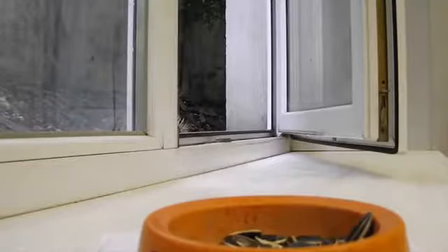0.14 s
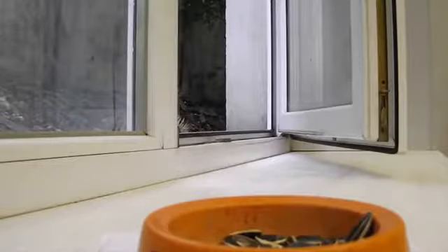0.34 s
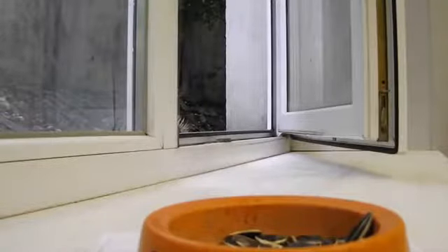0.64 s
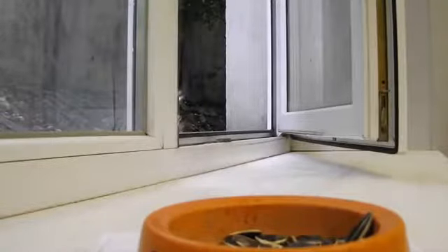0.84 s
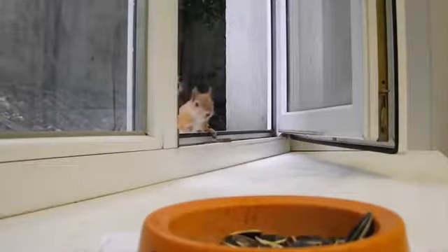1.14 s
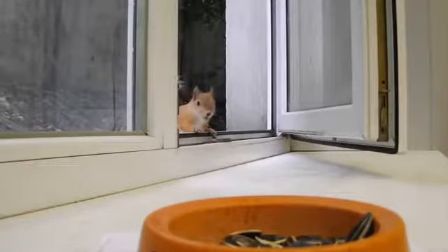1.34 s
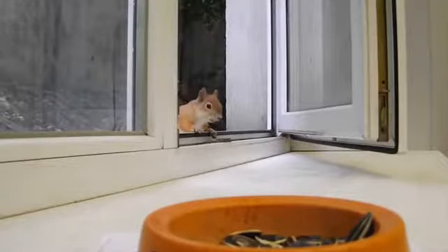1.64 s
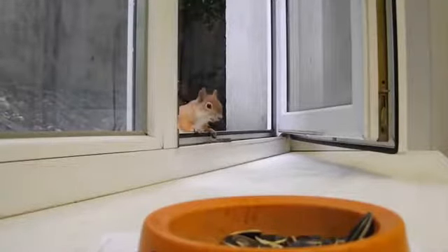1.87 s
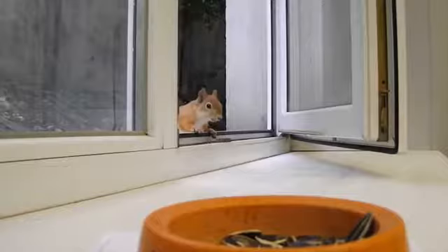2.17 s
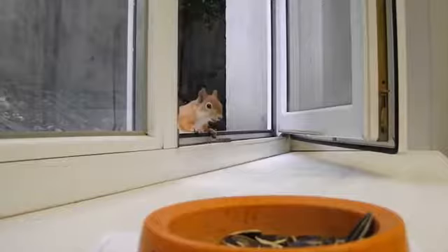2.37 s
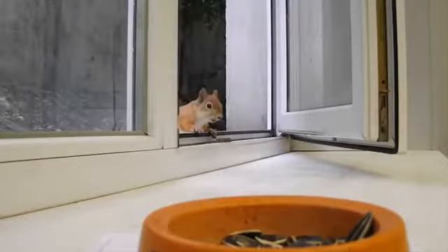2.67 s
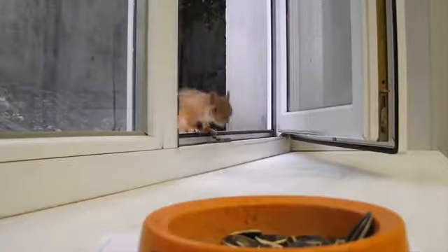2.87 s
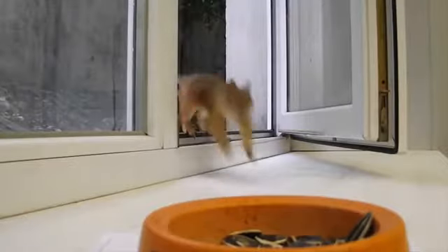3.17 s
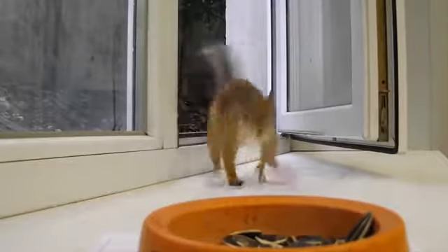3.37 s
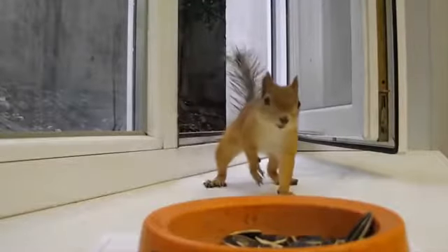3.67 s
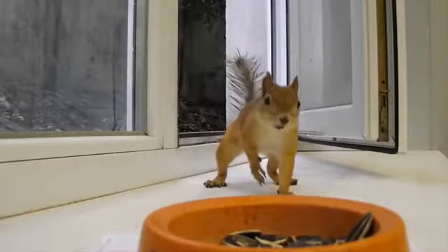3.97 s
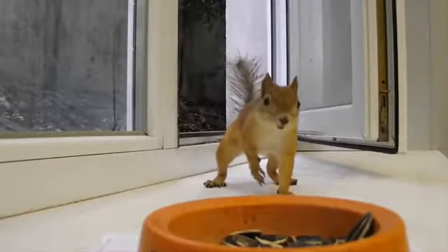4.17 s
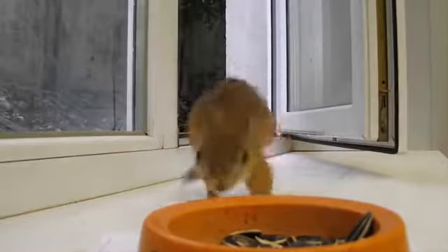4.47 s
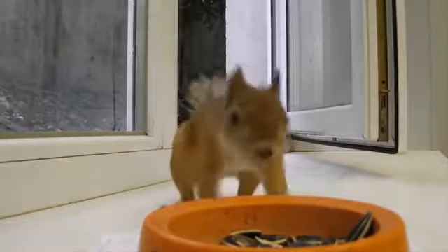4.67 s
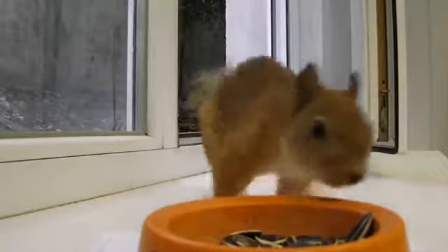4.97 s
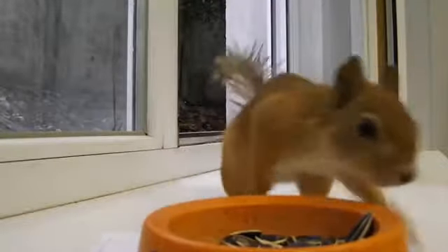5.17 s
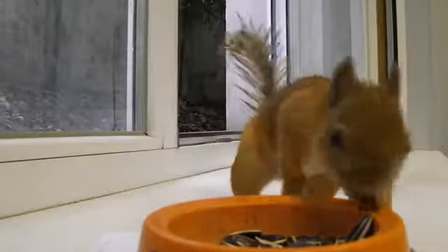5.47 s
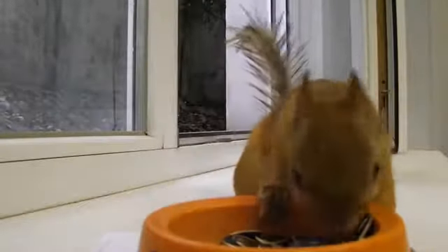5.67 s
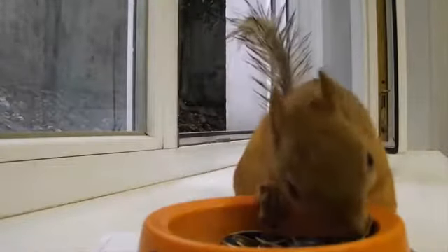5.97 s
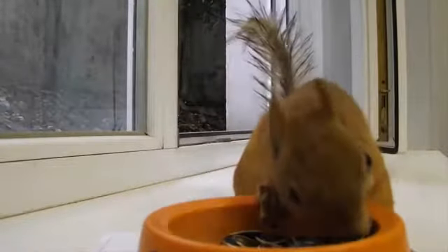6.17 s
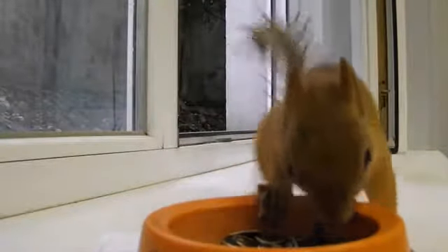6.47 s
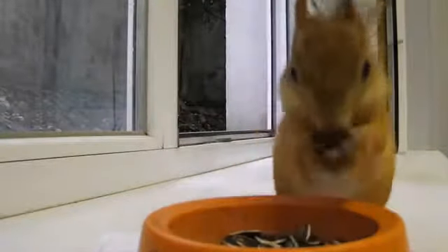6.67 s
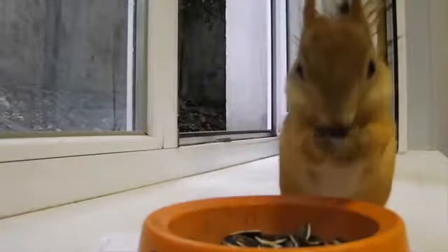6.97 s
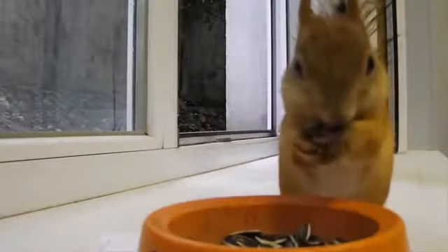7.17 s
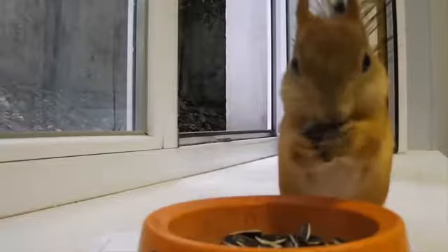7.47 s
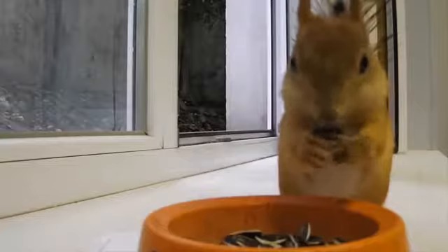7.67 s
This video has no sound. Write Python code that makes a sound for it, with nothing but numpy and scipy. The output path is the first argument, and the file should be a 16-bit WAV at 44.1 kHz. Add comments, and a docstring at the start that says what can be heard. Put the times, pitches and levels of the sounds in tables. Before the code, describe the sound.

Steady hiss with a low distant traffic rumble and a faint hum comes through an open window throughout. At about 0.9 seconds a squirrel's claws scrape lightly on the window's edge, with one tiny tick near 1.8. From 3.3 to 3.6 seconds it hops onto the hollow plastic sill with a quick cluster of thumps and knocks. Claws tick from 4 seconds, and more padded steps follow between 4.4 and 5.3, the hum swelling slightly near the end. From 5.9 to 6.5 seconds its snout stirs sunflower seeds, which scrape and click against a hard plastic bowl. Two more paw thumps come around 6.6. A small snap at 7.1 leads to loud, sharp cracks and crunches from 7.3 to 7.5 as its teeth split a shell, then a couple of faint clicks near 7.6. The squirrel sounds close, with a short room echo.

```python
"""An open window over a street: steady hiss coloured by narrow peaks and notches, a sill humming low.
A squirrel scrapes the frame with its claws, hops onto the hollow plastic sill and walks to a bowl; its
pads thump the sill's modes, toes knock, claws tick. Its snout stirs the seeds against hard plastic, then
its teeth split a shell in sharp snaps. A short echo follows; gain control ducks after loud snaps."""
import sys
import numpy as np
from scipy import signal
from scipy.fft import rfft, irfft, next_fast_len
from scipy.io import wavfile
from scipy.ndimage import uniform_filter1d, map_coordinates

SR = 44100
rng = np.random.default_rng(int(sys.argv[2]) if len(sys.argv) > 2 else 0)


def pcm_store(signal):
    """Save signal as 16-bit PCM."""
    levels = np.round(np.clip(np.atleast_2d(signal), -1, 1) * 32767)
    wavfile.write(sys.argv[1], SR, levels.astype(np.int16).T)


N = 344862

# stereo width: f/Hz, side gain/dB
WIDTH = [(2500, -80), (3700, -73), (4000, -47), (5500, -27), (7000, -10), (10000, -9), (14000, -12)]


def amp(db):
    """dB to gain."""
    return 10 ** (np.asarray(db) / 20)


def unit(x):
    """x at rms 1."""
    return x / np.sqrt(np.mean(x ** 2) + 1e-20)


def along(points, hz):
    """Interpolate (f/Hz, value) points on a log axis."""
    f, v = np.transpose(points)
    return np.interp(np.log(hz + 1), np.log(f + 1), v)


def curve(points):
    """Interpolate (t/s, value) points per sample."""
    return np.interp(np.arange(N) / SR, *np.transpose(points))


def wobble(rate_hz):
    """Smooth random curve, rate_hz knots a second."""
    knots = rng.standard_normal(int(N * rate_hz / SR) + 4)
    return map_coordinates(knots, [np.arange(N) * rate_hz / SR])


def filtered(x, response):
    """x through a complex frequency response."""
    m = next_fast_len(x.shape[-1] + 8192)
    return irfft(rfft(x, m) * response(np.fft.rfftfreq(m, 1 / SR)), m)[..., :x.shape[-1]]


def resonate(x, modes):
    """x twice through a bank of (f/Hz, width/Hz, gain/dB) modes, for steep sides."""
    bank = lambda f: sum((-1) ** k * amp(db) * 1j * f * width / (hz * hz - f * f + 1j * f * width)
                         for k, (hz, width, db) in enumerate(modes))
    return filtered(x, lambda f: bank(f) ** 2)


def favour(modes, best_hz, lift_db=4.5, log_span=0.15):
    """The place of a contact or break lifts the modes near one pitch."""
    return [(hz, width, db + lift_db / (1 + (np.log(hz / best_hz) / log_span) ** 2))
            for hz, width, db in modes]


def burst(length_ms, modes):
    """Short spray of tiny breaks ringing the modes, peak 1."""
    age = np.arange(SR // 16) / SR * 1000 / length_ms
    spray = rng.standard_normal(len(age)) * np.sqrt(age) * np.exp(-age ** 2)
    sound = resonate(spray, modes)
    return sound / np.abs(sound).max()


def add(track, start_s, sound):
    """Mix sound into track."""
    part = track[round(start_s * SR):][:len(sound)]
    part += sound[:len(part)]


def street(rumble_db=-43.5):
    """Far traffic and air: low rumble and steady hiss coloured by narrow peaks and notches."""
    # hiss envelope: t/s, level/dB
    hiss_levels = [(0.0, -38), (3.92, -37.5), (6.32, -36.5), (6.73, -38), (7.32, -37), (7.49, -37.5),
                   (7.82, -37.5)]
    # hiss spectrum: f/Hz, relative density/dB
    hiss_shape = [(410, -61), (700, -61), (800, -19.5), (1250, -8), (1450, -13.5), (1700, -2.5),
                  (2500, -8.5), (3600, -8), (4200, -19), (6300, -28), (9000, -34), (11200, -34),
                  (14250, -37), (14400, -73)]
    # narrow colouring of the hiss: f/Hz, half width/Hz, gain/dB
    hiss_peaks_and_notches = [(1584.7, 51, 12.5), (1818, 63, 3.5), (1913, 29, -16), (1977, 37, 3.5),
                              (2137, 61, -11.5), (2281, 180, 13.5), (2450, 28, -10.5), (2630, 92, 3.5),
                              (3316, 16, -15), (3440, 130, 3.5), (3687, 30.8, -57.5), (3701.5, 67.3, 26.5),
                              (4470, 53, 4.5), (5300, 204, 6), (7810, 560, 12.5), (9620, 630, 11.5)]
    # rumble spectrum: f/Hz, relative density/dB
    rumble_shape = [(8, -2), (24, -32), (44, -34), (57, -7), (70, -23.5), (106, -5.5), (160, -9),
                    (180, -12.5), (204, -1.5), (250, -11.5), (313, -8), (350, -16.5), (609, -14.5),
                    (750, -28), (1200, -101)]
    spectra = signal.stft(rng.standard_normal((3, N)), nperseg=512)[2]
    flicker = rng.standard_normal(spectra.shape[1:])
    flicker = uniform_filter1d(uniform_filter1d(flicker, size=8, axis=0), size=8, axis=1)
    mid, side, low = signal.istft(spectra * amp(1.18 * unit(flicker)), nperseg=512)[1][:, :N]
    peaks_db = lambda hz: sum(db / (1 + ((hz - centre) / width) ** 2)
                              for centre, width, db in hiss_peaks_and_notches)
    colour_db = lambda hz: along(hiss_shape, hz) + peaks_db(hz)
    mid = filtered(mid, lambda hz: amp(colour_db(hz)))
    side = filtered(side, lambda hz: amp(colour_db(hz) + along(WIDTH, hz)))
    low = filtered(low, lambda hz: amp(along(rumble_shape, hz)))
    hiss_gain = amp(curve(hiss_levels) + 0.4 * wobble(9.6)) / np.std(mid)
    rumble = amp(rumble_db + 0.18 * wobble(17)) * unit(low)
    return hiss_gain * np.array([mid + side, mid - side]) + rumble


def sill_hum(hum_hz=29, beat_hz=2.6, in_step_s=5.14, upper_hz=56.6, upper_db=-50):
    """The sill trembles at two close, beating notes and a third about an octave up."""
    # main note envelope: t/s, level/dB
    levels = [(0, -60), (1, -48.5), (3.4, -44.5), (4.6, -37.5), (5.04, -37), (5.11, -30), (5.27, -30.5),
              (5.36, -38), (6.2, -36), (7.3, -38.5), (7.7, -35)]
    phase = 2 * np.pi * np.cumsum(hum_hz * (1 + 0.0243 * wobble(2.7))) / SR
    beat = 2 * np.pi * beat_hz * (np.arange(N) / SR - in_step_s)
    partner = np.linspace(0.55, 0.09, N) * np.sin(phase - beat)
    pair = amp(curve(levels) + 2.8 * wobble(8.1)) * (np.sin(phase) + partner)
    upper = amp(upper_db + 4.4 * wobble(5)) * np.sin(upper_hz / hum_hz * phase)
    return pair + upper


def scrapes(grains_per_s=900, rise_s=0.012, fall_s=0.025):
    """Claws on the frame, then the snout in the seeds: uneven grains ring in hard plastic."""
    # strokes: t/s, level/dB, hold/s, favoured f/Hz
    strokes = [(0.87, -40.5, .012, 3100), (5.886, -46, .03, 3570), (5.939, -38, 0.028, 2300),
               (5.988, -44, 0.043, 3600), (6.062, -46, .02, 3800), (6.1, -31, 0.031, 2300),
               (6.14, -41, 0.022, 3680), (6.2, -34, .02, 2300), (6.242, -37.5, 0.034, 3330),
               (6.287, -36, .03, 2900), (6.319, -36, 0.019, 2400), (6.433, -39, .015, 3100)]
    # plastic modes: f/Hz, width/Hz, gain/dB
    plastic = [(2260, 340, 2), (3150, 810, -2), (3700, 510, -1), (4600, 830, -8)]
    out, t = np.zeros(N), np.arange(SR // 5) / SR
    for start_s, db, hold_s, best_hz in strokes:
        hits = rng.random(len(t)) < grains_per_s / SR
        grains = hits * rng.standard_normal(len(t)) * amp(1.6 * rng.exponential(size=len(t)))
        envelope = np.interp(t, np.cumsum([0, rise_s, hold_s, fall_s]), [0, 1, 1, 0])
        add(out, start_s, amp(db) * envelope * unit(resonate(grains, favour(plastic, best_hz))))
    return out


def ticks():
    """Each claw or seed contact is a bright tick over a duller knock of sill or bowl."""
    # contacts: t/s, tick peak/dB, f/Hz, knock re tick/dB, length/ms
    contacts = [(.872, -35, 7600, 10, 15), (0.883, -38.5, 7950, 4, 14), (1.812, -39.5, 7400, -6, 10),
                (4.034, -31, 6270, 11, 1.9), (4.045, -44, 6500, 15, 6), (4.137, -40, 5100, 13, 11),
                (4.145, -37, 6100, 6, 4), (4.227, -41, 5940, 14, 6), (4.239, -29, 5940, 4, 2.3),
                (4.338, -31.5, 6360, 5, 2.6), (4.352, -35.5, 5500, 8, 3.6), (4.475, -33.5, 8000, 4.5, 3),
                (4.605, -47, 7000, 16, 7.4), (4.617, -35, 8700, 5, 6.1), (4.757, -41.5, 8100, 13.5, 16),
                (5.062, -50, 7000, 18, 8), (5.108, -32, 7900, -3, 22), (6.026, -31, 6100, 1, 3.1),
                (6.037, -41, 5350, 18.5, 3.4), (6.044, -49, 5350, 22, 4.5), (6.149, -37, 7350, 13, 17),
                (6.22, -39, 5200, 13, 4.2), (6.231, -32, 6300, 11.5, 4.3), (6.242, -34.5, 7400, 4, 24),
                (6.258, -31, 7060, 5, 5.9), (6.27, -46, 9000, 16, 4.5), (6.299, -40.5, 8500, 16, 3.7),
                (6.341, -39, 5450, -2, 4.4), (6.354, -46, 7500, -4, 4), (6.364, -43, 7500, -4, 4),
                (6.44, -45, 7600, 17.5, 13), (6.451, -47, 7700, 20, 6), (6.571, -36, 7750, 14, 1.8),
                (6.574, -30.5, 7650, 13, 6.8), (6.582, -39, 7860, 12, 9), (6.634, -34.5, 7660, 11, 4.7)]
    knock_modes = [(1400, 970, -1.5), (2276, 210, 8.5), (3320, 1200, 1.5)]
    out = np.zeros(N)
    for start_s, db, hz, knock_db, length_ms in contacts:
        add(out, start_s, amp(db) * burst(length_ms, [(hz, 1800, 0), (1.35 * hz, 4000, -9)]))
        add(out, start_s, amp(db + knock_db) * burst(length_ms, knock_modes))
    return out


def paws(attack_s=0.0018):
    """A soft pad pushes the hollow sill, toes knock; where it lands sets which mode rings most."""
    # steps: t/s, thump peak/dB, favoured f/Hz, its lift/dB, t60 factor,
    # knock peak/dB, knock f/Hz, knock length/ms
    steps = [(3.2626, -45, 500, 13, .86, -14.5, 1160, 2), (3.2645, -23, 175, 23, 0.28, -20, 3150, 3.5),
             (3.27, -16, 175, 28, .34, -21, 1390, 3.4), (3.284, -20, 300, 15, 0.28, -22, 980, 13),
             (3.2904, -12, 280, 14, 1.23, -40, 970, 9.4), (3.305, -29.5, 325, 24, 1.2, -43, 600, 5.5),
             (3.446, -18.5, 330, 13, .34, -23, 1520, 3.5), (3.451, -11.5, 174, 13, 1.25, -25.5, 980, 8.7),
             (3.465, -31, 215, 13, 0.67, -28, 3180, 2.7), (3.496, -33, 215, 13, .81, -35, 606, 6),
             (3.56, -45, 215, 11, .5, -25, 1750, 4.7), (3.563, -24.5, 556, 29, 1.04, -31, 1250, 12),
             (4.401, -19.5, 318, 8, .6, -22.5, 1240, 4.3), (4.4092, -15.5, 200, 10, 0.36, -26, 580, 5.6),
             (4.4197, -20.5, 385, 20, 1.8, -36, 497, 8.9), (4.507, -31, 490, 10, 1.5, -28.5, 1500, 4.2),
             (4.607, -24.5, 330, 26, 0.33, -30, 1150, 6.2), (4.6109, -18.5, 218, 11, 0.73, -37, 3040, 10),
             (4.6125, -24, 480, 13, .5, -37, 815, 4), (4.6219, -22, 96, 18, 0.91, -45, 800, 4),
             (4.755, -28.5, 496, 16, 1.2, -30, 1260, 14), (5.0573, -22, 427, 18, 0.49, -21.5, 1350, 4.7),
             (5.0623, -20.5, 420, 15, 2.1, -22, 1770, 4.7), (5.071, -25, 480, 13, 1.1, -28, 1010, 3.6),
             (5.086, -20.5, 219, 13, 1.4, -39, 500, 5.3), (5.254, -26, 217, 9, 0.54, -31.5, 1180, 10),
             (6.573, -27, 258, 19, .57, -23.5, 990, 4.3), (6.584, -26, 402, 11, 1.3, -34, 705, 12),
             (6.636, -17, 200, 16, 0.61, -21.5, 1560, 2.9), (6.641, -21, 162, 19, 1.5, -34, 503, 6)]
    # sill modes: f/Hz, level/dB, t60/s
    sill = [(97.8, -1.5, 0.14), (161, -0.5, 0.12), (193, 1, 0.043), (265, 2.5, 0.034), (321.4, -5, 0.19),
            (382, 5.5, 0.018), (488, 0.5, 0.064), (564, -8, 0.072)]
    out, t = np.zeros(N), np.arange(SR // 3) / SR
    for start_s, db, best_hz, lift_db, t60_factor, knock_db, knock_hz, knock_ms in steps:
        ring = np.zeros(len(t))
        for k, (hz, mode_db, t60_s) in enumerate(sill):
            mode_db += lift_db / (1 + (np.log(hz / best_hz) / 0.18) ** 2) + rng.normal(0, 1.5)
            sign = (-1) ** (k // 3)  # groups of modes swing against each other
            ring += sign * amp(mode_db - 60 * t / (t60_factor * t60_s)) * np.sin(2 * np.pi * hz * t)
        ring *= 1 - np.exp(-(t / attack_s) ** 2)
        add(out, start_s, -amp(db) * ring / np.abs(ring).max())
        knock_modes = [(ratio * knock_hz, width * knock_hz, gain_db)
                       for ratio, width, gain_db in [(0.49, 0.53, -6), (1, 0.44, 0), (1.46, 0.51, -7)]]
        add(out, start_s, amp(knock_db) * burst(knock_ms, knock_modes))
    return out


def shell_cracks(grit_db=-41, grit_low_db=8, grit_ms=22):
    """Teeth split the shell in sharp snaps; splinters grind on after each. Returns mid, side."""
    # snaps: t/s, high peak/dB, favoured high f/Hz, low re high/dB, favoured low f/Hz,
    # length/ms, side re high before width filter/dB
    snaps = [(7.131, -21, 8800, -4, 3900, 4, -29), (7.144, -30, 7950, -9, 4000, 3, -12),
             (7.3252, -16, 9500, -6, 1800, 0.77, -45), (7.327, 1, 10100, -27, 2400, 0.25, -45),
             (7.329, -6, 8300, -22, 4500, 0.35, -45), (7.33, -11, 8500, -23, 4000, 0.36, -45),
             (7.3337, -12, 8500, -20, 4000, .5, -30), (7.334, -31, 10500, 2, 4000, 7.9, -4),
             (7.3655, -40, 8000, 15, 4000, 2.7, -10), (7.372, -28, 9000, 6, 4000, 1.7, -10),
             (7.376, -25, 7000, 0, 3000, .8, -4), (7.3783, -20, 7000, 4, 4100, 1.04, -6),
             (7.382, -15, 8900, -6, 4000, 1.2, -4), (7.384, -13, 8440, -10, 4000, 0.5, -10),
             (7.384, -31, 8000, 4, 4000, 4.5, -6), (7.413, -13, 10000, -17, 4000, .5, -45),
             (7.414, -10, 8700, -13, 4000, 0.86, -45), (7.4341, 1, 7260, -0.5, 4050, 0.75, -45),
             (7.4358, 4.5, 8340, -20, 4050, 0.53, -47), (7.4366, -10, 8300, -6, 4050, 1.8, -45),
             (7.4425, -13, 8000, 2, 3800, 3, -45), (7.443, -10, 8800, -12, 4000, 0.8, -45),
             (7.448, -25, 8000, 0, 4000, 3.6, -30), (7.454, -27, 8500, 7, 3200, 2, -2),
             (7.457, -17, 9000, -7, 3500, 5, -3), (7.4626, -7, 8850, -9, 4300, 1.5, 2),
             (7.465, -3.5, 8850, -17, 4300, .6, 5), (7.466, -11, 8000, -12, 4000, 3, -1),
             (7.469, -3.5, 8800, -3, 4000, 1.3, -5), (7.47, -4, 8900, -7.5, 4030, 2.1, -5),
             (7.475, -16, 8000, -9, 3000, 7.5, -6), (7.48, -9, 8000, -7, 4000, 0.59, -14),
             (7.481, 2.5, 8500, -24, 4000, 0.61, -15), (7.4878, -14, 8500, -12, 4000, .6, -12),
             (7.4891, -7, 8300, -21, 4000, 0.52, -14), (7.491, -34, 8300, -12, 3000, 7.3, -6),
             (7.6239, -22, 8500, -20, 4000, 2.2, -32), (7.629, -30, 8500, -14, 4000, 2, -22),
             (7.6484, -29.5, 8100, -12, 4000, 2.4, -10)]
    # upper shell modes: f/Hz, width/Hz, gain/dB
    high_modes = [(6470, 1730, 4.5), (8400, 1560, 7.5), (10070, 1760, 5), (13000, 1300, 3)]
    # lower shell modes: f/Hz, width/Hz, gain/dB
    low_modes = [(1140, 950, -7.5), (2460, 440, 2.5), (3190, 630, -0.5), (4100, 440, 0.5),
                 (5000, 630, -2.5)]
    mid, side = np.zeros((2, N))
    for start_s, db, high_hz, low_db, low_hz, length_ms, side_db in snaps:
        add(mid, start_s, amp(db) * burst(length_ms, favour(high_modes, high_hz)))
        add(side, start_s, amp(db + side_db) * burst(length_ms, favour(high_modes, high_hz)))
        add(mid, start_s, amp(db + low_db) * burst(length_ms, favour(low_modes, low_hz)))
        add(mid, start_s, amp(db + grit_db) * burst(grit_ms, high_modes))
        add(mid, start_s, amp(db + grit_db + grit_low_db) * burst(grit_ms, low_modes))
    return mid, filtered(side, lambda hz: amp(along(WIDTH, hz) + 4))


def room_echo(x):
    """Each frequency dies at its own rate; left and right differ only in the treble."""
    # room decay: f/Hz, t60/s
    decay = [(200, 1), (2000, 0.25), (8000, 0.29), (14000, 0.0093)]
    hz, t, spectra = signal.stft(rng.standard_normal((2, SR // 3)), SR, nperseg=128)
    tail = signal.istft(spectra * amp(-60 * t / along(decay, hz)[:, None]), SR, nperseg=128)[1]
    mid, side = signal.fftconvolve(x[None], tail / np.linalg.norm(tail[0]), axes=1)[:, :N]
    side = filtered(side, lambda hz: amp(along(WIDTH, hz) - 1.0))
    return np.array([mid + side, mid - side])


def scene(echo_db=-17.5):
    """Squirrel and seeds close by, over street and hum."""
    snaps, side = shell_cracks()
    squirrel = paws() + ticks() + scrapes() + snaps
    echo = amp(echo_db) * room_echo(squirrel)
    return squirrel + np.array([side, -side]) + echo + street() + sill_hum()


def record(dry):
    """Gain control ducks just after loud snaps and creeps back; soft clip, mono lows, band limit."""
    threshold_db, max_duck_db, ceiling = -4, 6, 0.84
    mono_below_hz, top_hz, edge_hz = 3700, 14900, 600
    lag = lambda x, tau_s: signal.lfilter([1 - np.exp(-1 / (tau_s * SR))],
                                          [1, -np.exp(-1 / (tau_s * SR))], x)
    over_db = np.maximum(20 * np.log10(np.abs(dry).max(axis=0) + 1e-9) - threshold_db, 0)
    duck_db = np.minimum(300 * lag(lag(over_db, 0.026), 0.04), max_duck_db)
    ducked = dry * amp(-duck_db)
    left, right = ducked / (1 + np.abs(ducked / ceiling) ** 6) ** (1 / 6)
    mid = (left + right) / 2
    side = filtered((left - right) / 2, lambda hz: hz > mono_below_hz)
    return filtered(np.array([mid + side, mid - side]),
                    lambda hz: np.clip((top_hz - hz) / edge_hz, 0, 1) ** 2)


dry = scene()
out = record(dry)
pcm_store(out)
```